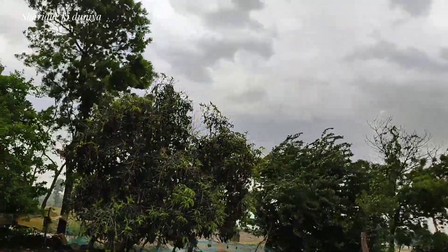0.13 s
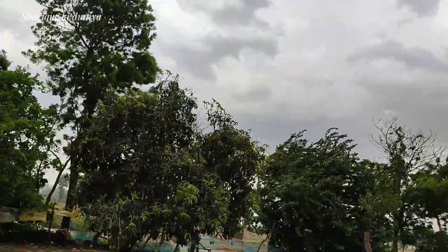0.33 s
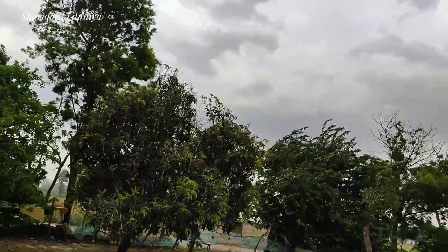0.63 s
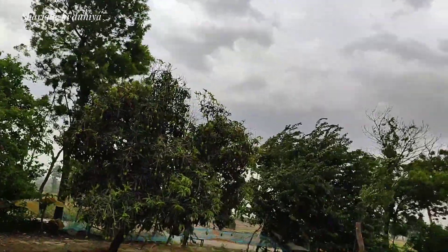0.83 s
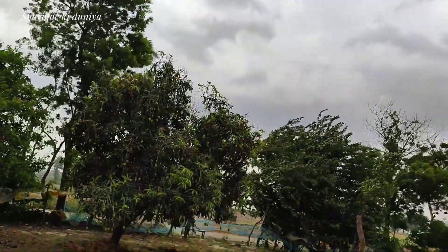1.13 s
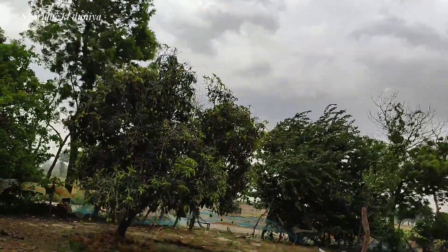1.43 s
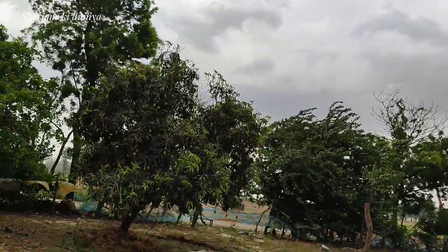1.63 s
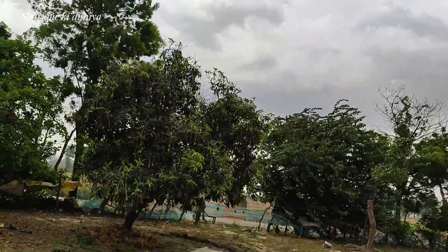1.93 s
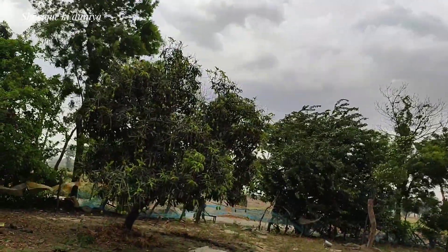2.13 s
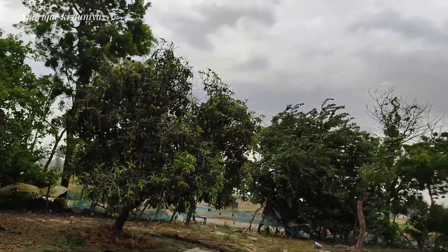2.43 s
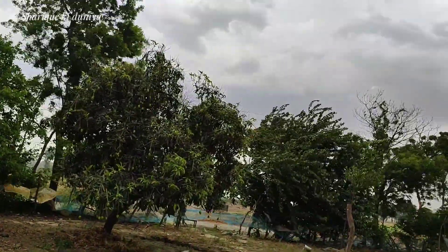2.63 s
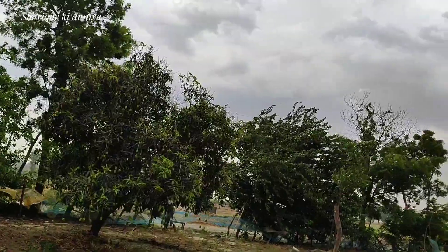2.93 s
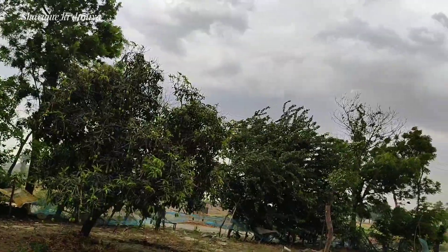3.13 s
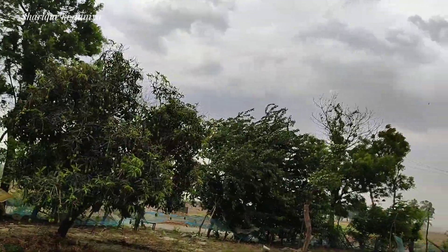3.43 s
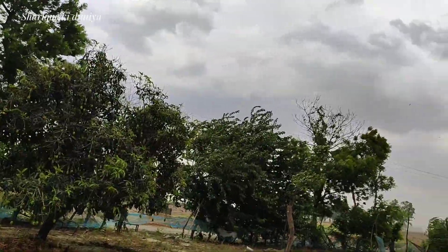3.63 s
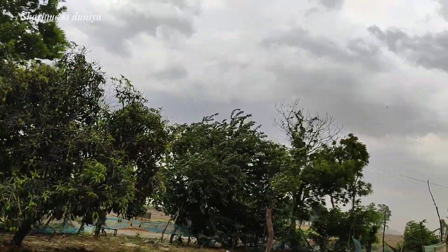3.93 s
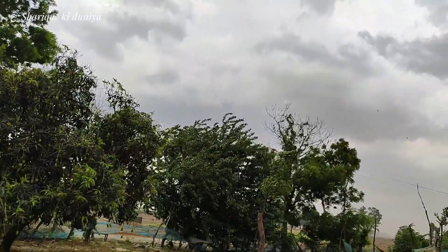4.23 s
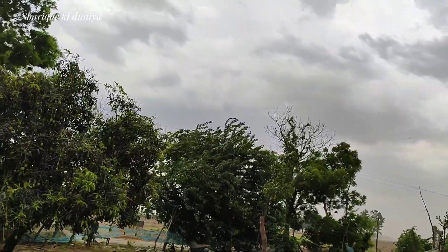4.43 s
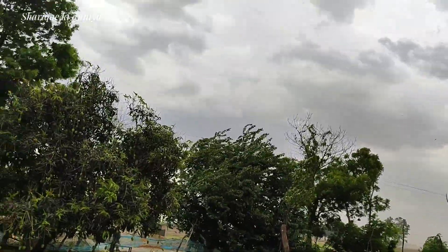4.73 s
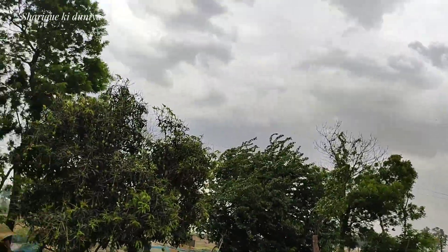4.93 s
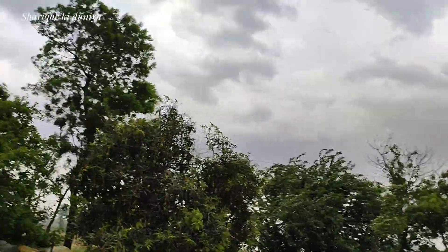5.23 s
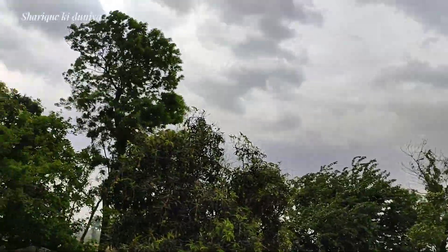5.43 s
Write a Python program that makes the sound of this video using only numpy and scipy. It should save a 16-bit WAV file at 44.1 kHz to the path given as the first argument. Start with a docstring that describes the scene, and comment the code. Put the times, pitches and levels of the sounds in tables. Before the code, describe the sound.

Storm wind buffets the microphone in rumbling gusts, easing and then returning harder, while tree leaves hiss and rustle throughout.

```python
"""The edge of a village, in storm wind, by a row of tossing trees. Distant crowns roar; nearer leaves
hiss, patter and flick close to the microphone. Gusts hit its two ports, mostly the left, as a rumble
that gets brighter and rougher with air speed. They die down, then return harder; the strongest
blasts rasp over the rim of the left port and push the recorder's limiter."""
import sys
import numpy as np
from scipy import signal
from scipy.fft import rfft, irfft, next_fast_len
from scipy.io import wavfile
from scipy.ndimage import uniform_filter1d, minimum_filter1d, map_coordinates

SR = 44100
rng = np.random.default_rng(int(sys.argv[2]) if len(sys.argv) > 2 else 0)


def generate_wav(sig):
    """Save sig (samples, or channels by samples) to the path in sys.argv[1] as 16-bit PCM at SR."""
    pcm = np.round(np.clip(np.atleast_2d(sig).T, -1, 1) * 32767).astype(np.int16)
    wavfile.write(sys.argv[1], SR, pcm)


N = 246078


def from_db(db):
    """Decibels to gain."""
    return 10 ** (np.asarray(db) / 20)


def rms_one(x):
    """Scale to an rms of 1."""
    return x / np.sqrt(np.mean(x ** 2) + 1e-20)


def in_time(rows):
    """Each column of a timed table at every sample."""
    times, *columns = np.transpose(rows)
    return [np.interp(np.arange(N) / SR, times, column) for column in columns]


def at_hz(points, hz):
    """Read a spectrum on a log-frequency axis."""
    freqs, values = np.transpose(points)
    return np.interp(np.log(hz + 1e-9), np.log(freqs), values)


def drift(hz):
    """A random wander with a spread of 1: noise twice through a one-pole low-pass."""
    hop, run_in = 40, 2000
    pole = np.exp(-2 * np.pi * hz * hop / SR)
    noise = rng.standard_normal(N // hop + run_in + 2)
    slow = signal.lfilter([1], [1, -2 * pole, pole * pole], noise)[run_in:]
    return np.interp(np.arange(N) / hop, np.arange(len(slow)), rms_one(slow))


def colour(x, spectrum):
    """Give a sound a spectrum and an rms of 1."""
    size = next_fast_len(N)
    gain = from_db(at_hz(spectrum, np.fft.rfftfreq(size, 1 / SR)))
    return rms_one(irfft(rfft(x, size) * gain, size)[..., :N])


def resonate(x, hz, width_hz):
    """A resonance with a peak gain of 1."""
    r = np.exp(-np.pi * width_hz / SR)
    feedback = [1, -(1 + r * r) * np.cos(2 * np.pi * hz / SR), r * r]
    return signal.lfilter(np.array([1, 0, -1]) * (1 - r * r) / 2, feedback, x)


def mean_along(x, place, reach):
    """Mean of x over the air that lies within reach on either side."""
    samples, total = np.arange(N), np.cumsum(x)
    ahead, behind = (np.interp(place + d, place, samples) for d in (reach, -reach))
    return (np.interp(ahead, samples, total) - np.interp(behind, samples, total)) / (ahead - behind)


def from_all_round(pair):
    """Mix two unrelated sounds into left and right, as alike as a wide source is at each pitch."""
    # likeness of distant sound at the two ports: (frequency [Hz], correlation [-1 to 1])
    likeness = [(30, 1), (350, 0.97), (700, 0.42), (1100, -0.41), (2000, -0.027), (3000, -0.092),
                (5200, -0.084), (6500, 0.33), (7800, 0.37), (9000, 0.96), (15000, 0.82)]
    size = next_fast_len(N)
    alike = np.clip(at_hz(likeness, np.fft.rfftfreq(size, 1 / SR)), -1, 1)
    mid, side = rfft(pair, size) * np.sqrt([1 + alike, 1 - alike])
    return irfft([mid + side, mid - side], size)[:, :N]


def leaves(rustle_db, touches_per_s, size_spread_db, patter_db, toss_db, toss_hz, bands):
    """Each size of leaf rustles in its own band, swelling as twigs toss: far ones hiss, near ones tick."""
    # spectrum of the rustle: (frequency [Hz], relative density [dB])
    spectrum = [(400, -12), (1200, 1.5), (1900, 2), (3300, 2), (5000, 2), (7000, 2.5), (8000, 3.5),
                (8800, -4), (10500, -4.5), (13000, -10.5), (15500, -15.5)]
    rate = touches_per_s * from_db(rustle_db - rustle_db.mean())
    size_db = size_spread_db * np.minimum(rng.exponential(1, (2, N)), 4)
    sizes = from_db(size_db) * rng.choice([-1, 1], (2, N))
    touching = rng.random((2, N)) < rate / SR
    ticks = rms_one(sizes * touching) * from_db(patter_db) * np.sqrt(bands)
    tick_band = rng.integers(bands, size=(2, N))
    hiss = rng.standard_normal((2, 2, N))   # neighbouring bands get unrelated noise
    edges_hz = np.linspace(np.sqrt(500), np.sqrt(16500), bands + 1) ** 2
    rustle = 0
    for k in range(bands):
        bandpass = signal.butter(2, edges_hz[k:k + 2], "band", fs=SR, output="sos")
        band = signal.sosfilt(bandpass, hiss[k % 2] + ticks * (tick_band == k))
        rustle = rustle + band * from_db(toss_db * drift(toss_hz))
    return from_db(rustle_db) * colour(from_all_round(rustle), spectrum)


def far_trees(rustle_db, level_db, follow):
    """The dull roar of distant crowns follows the wind only loosely."""
    # spectrum of the roar: (frequency [Hz], relative density [dB])
    spectrum = [(20, 2.5), (50, 0), (140, -1.5), (260, -6), (400, -6.5), (520, -10), (750, -8),
                (1100, -12.5), (1800, -16.5), (4000, -19), (9000, -42)]
    roar = colour(from_all_round(rng.standard_normal((2, N))), spectrum)
    return from_db(level_db + follow * (rustle_db - rustle_db.mean())) * roar


def through_ports(sound):
    """The cavity behind the microphone's left port rings with the sound that enters it."""
    # resonances of the cavity: (frequency [Hz], width [Hz], boost [dB])
    cavity = [(2454, 920, 6), (7520, 615, 11.5)]
    left, right = sound
    for hz, width_hz, boost_db in cavity:
        left = left + (from_db(boost_db) - 1) * resonate(left, hz, width_hz)
    # above its resonance the cavity dulls the treble
    left = left - 0.46 * resonate(left, hz=9350, width_hz=3700)
    return np.array([left * from_db(-0.65), right])


def wind_force(attack_s, release_s):
    """Buffet level in dB at each port: the slow wind, plus puffs that arrive, hold and let go."""
    # wind on the left port, which faces it: (time [s], level [dB])
    windward = [(0, -8), (.04, -10), (.07, -12.5), (.24, -11), (.29, -16), (.42, -22), (.57, -20),
                (.66, -22.5), (.76, -32.5), (1.5, -34.5), (1.71, -41.5), (3.34, -53), (3.49, -33.5),
                (3.81, -33.5), (3.96, -28), (4.33, -19.5), (4.47, -17.5), (4.56, -18.5), (4.68, -29),
                (4.74, -23.5), (4.83, -23), (4.88, -19), (5.03, -16), (5.14, -12.5), (5.19, -14),
                (5.27, -12), (5.31, -13.5), (5.39, -10.5), (5.58, -7)]
    # wind on the sheltered right port: (time [s], level [dB])
    leeward = [(0, -26.5), (.71, -28), (.78, -39), (1.19, -37.5), (2.8, -57.5), (4.11, -39), (4.81, -38),
               (5.1, -28.5), (5.15, -22.5), (5.33, -18.5), (5.58, -17.5)]
    # single puffs: (start [s], length [s], left rise [dB], right rise [dB])
    puffs = [(0.099, 0.098, 3, 6), (0.477, 0.047, 3, -0.5), (0.607, 0.053, 0.5, 6), (0.927, 0.036, 7.5, 0),
             (1.035, 0.04, 2.5, 8), (1.078, 0.074, 9, 3), (1.244, 0.039, 6.5, 0), (1.389, 0.054, 9, 3),
             (1.885, 0.0501, 14, 0), (3.838, 0.026, 8, 0), (3.974, 0.062, 8, 0), (4.086, 0.09, 3.5, 3),
             (4.281, 0.044, 2, 12.5), (4.35, 0.115, 3.5, -0.5), (4.487, 0.071, 4.5, 8),
             (4.596, 0.0368, 3, 10), (4.862, .036, 3, 11), (4.92, 0.073, 2.5, 11), (5.053, 0.079, 4.5, 0),
             (5.198, 0.09, 4, 1), (5.327, 0.0406, 1, 4), (5.387, 0.069, 2.5, 1), (5.469, 0.019, 0, 4)]
    t = np.arange(N) / SR
    force_db = np.array(in_time(windward) + in_time(leeward))
    for start, length, left_db, right_db in puffs:
        arrive = np.clip((t - start) / attack_s, 0, 1)
        let_go = np.clip(1 - (t - start - length) / release_s, 0, 1)
        force_db = force_db + np.outer([left_db, right_db], arrive * let_go)
    return force_db


def buffet(level_db, rise_db, jump_db, flutter_db, flutter_hz, push, even_eddies, spike, vent_hz):
    """A frozen pattern of eddies is blown past a port: faster air is both higher and louder."""
    # pressure of eddies passing at pattern_hz: (frequency [Hz], relative density [dB])
    eddies = [(15, 3), (50, 5.5), (150, 1), (280, -3), (450, -10), (700, -19.5), (1100, -35.5),
              (1800, -47.5), (3000, -95)]
    pattern_hz, calm_hz, force_hz = 200, 43.74, 831.1
    eddy_hz = calm_hz + force_hz * from_db(level_db) ** 1.02
    surge_db = flutter_db * 2 * np.tanh(drift(flutter_hz) / 2)
    travelled = np.cumsum(from_db(jump_db + surge_db) * eddy_hz / pattern_hz)
    pattern = colour(rng.standard_normal(N), eddies)
    pressure = map_coordinates(pattern, [travelled], order=3, mode="wrap")
    # the slowest pressure changes leak away through the capsule's vent
    pressure = signal.sosfilt(signal.butter(1, vent_hz, "high", fs=SR, output="sos"), pressure)
    # over a few eddies the wind alone sets the power
    reach = even_eddies * SR / pattern_hz / 2
    power = mean_along(mean_along(pressure ** 2, travelled, reach), travelled, reach)
    pressure = pressure / np.sqrt(np.abs(power) + 1e-9)
    # pressure goes with the square of speed, which sharpens the crests
    pressure = pressure + spike * (pressure ** 2 - 1)
    return from_db(level_db + rise_db + push * surge_db) * pressure


def rim_rasp(level_db, grit_db, grit_hz):
    """Air tears off the rim of the port in a dense run of tiny uneven bursts."""
    # spectrum of the rasp: (frequency [Hz], relative density [dB])
    spectrum = [(150, -28), (400, 0.5), (750, 4.5), (1300, -2.5), (2000, -9.5), (2800, -19), (4000, -27),
                (7000, -42), (12000, -70)]
    bursts = rng.standard_normal(N) * from_db(grit_db * np.tanh(drift(grit_hz)))
    return from_db(level_db) * colour(bursts, spectrum)


def leaf_flicks():
    """Leaves brush close to the microphone in short, bright swells of friction noise."""
    # flicks: (time [s], half length [s], left level [dB], right level [dB], centre [Hz], width [Hz])
    flicks = [(0.026, 0.02, -54, -37, 4800, 2500), (0.85, 0.0039, -42, -42, 7020, 5000),
              (2.88, 0.0055, -30.5, -44, 7680, 707), (2.885, 0.03, -36.5, -49, 7200, 1560),
              (5.053, 0.0059, -34, -37, 7900, 8100), (5.258, 0.032, -38.5, -37.5, 7600, 7938)]
    t, out = np.arange(N) / SR, np.zeros((2, N))
    for time, half_s, left_db, right_db, hz, width_hz in flicks:
        noise = rng.standard_normal((2, N))
        friction = rms_one(resonate(resonate(noise, hz, width_hz), hz, width_hz))
        swell = np.exp(-2 * ((t - time) / half_s) ** 2)
        out += from_db([[left_db], [right_db]]) * friction * swell
    return out


def eddy_slaps():
    """The hardest eddies slap the left port: brief jumps of pressure and air speed, both in dB."""
    # slaps: (time [s], half length [s], pressure rise [dB], air speed jump [dB])
    slaps = [(0.042, 0.015, -0.5, 4), (0.081, 0.009, 4.5, -2.5), (0.117, 0.0067, -3, 3),
             (0.154, 0.015, 2.5, 2), (0.189, 0.0045, 4.5, 0.5), (0.218, 0.0055, 4.5, 4),
             (0.234, 0.0083, 0.5, 5), (0.263, 0.0072, 2.5, 2.5), (0.314, 0.01, 4, 4.5),
             (.362, 0.0099, 7, -0.5), (0.5, 0.01, 5, 4.5), (0.536, 0.0072, 11, -1), (0.566, 0.0041, 4, 5.5),
             (0.891, 0.009, 8, 0.5), (0.956, 0.01, 3, 0.5), (1.11, 0.01993, 6.5, 2.5),
             (1.153, 0.014, 4, 2.5), (1.34, 0.0095, 6.5, 0), (1.432, 0.013, 1.5, 0), (1.489, 0.013, 8, -1),
             (3.896, 0.0093, 8, 10), (3.984, 0.0081, 5, 1.5), (4.019, 0.0099, 3.5, 1),
             (4.129, 0.0083, -1, 3), (4.17, 0.011, 6, 1), (4.22, .014, 4.5, 0), (4.285, 0.012, 2, 1),
             (4.362, 0.0058, 5.5, 3.5), (4.405, 0.00591, 5, 1.5), (4.451, 0.0057, 1.5, 2),
             (4.505, .012, 5, .5), (4.549, 0.013, 2, 2), (4.63, 0.011, 3.5, 3), (4.774, 0.0082, 9, 3),
             (4.826, 0.00817, 8, 3.5), (4.878, 0.016, 5.5, -1.5), (4.943, 0.0048, 7, 1),
             (5.065, 0.0041, 3, 1.5), (5.082, 0.0039, 10, -0.5), (5.089, 0.0018, 4, 0),
             (5.113, 0.0051, 6, 2), (5.161, 0.0066, 6.5, 1.5), (5.23, 0.0096, 3.5, 3),
             (5.254, 0.0023, 4, 0.5), (5.282, .007, 1.5, 4), (5.336, .007, 2, -0.5), (5.36, 0.003, 5, 4.5),
             (5.404, 0.0081, 4, 2), (5.454, 0.0048, 1, 2.5), (5.505, .014, 1, 1.5), (5.543, 0.0039, 1.5, 2)]
    t = np.arange(N) / SR
    return sum(np.outer([rise_db, jump_db], np.exp(-((t - time) / half_s) ** 2))
               for time, half_s, rise_db, jump_db in slaps)


def scene():
    """Trees near and far all round the microphone, and the wind itself on each port."""
    # wind in the crowns: (time [s], rustle level [dB], lean to the left [dB])
    crowns = [(0, -39, -2), (.28, -38, -0.5), (.45, -37, 1.2), (.85, -38, 1.8), (1.15, -37.4, 1),
              (1.5, -39, 0.96), (2.3, -40, 1.1), (3.2, -42, 0.95), (4.7, -42.5, 2.5), (5.1, -43, 1.5),
              (5.58, -42, -0.3)]
    # the left port swings until the wind cuts across its rim:
    # (time [s], extra air speed [dB], rasp gain [dB])
    grazing = [(0, -1, -3.5), (.25, -0.7, -10.5), (.7, -0.52, -17), (1.05, 1, -18), (3.9, 0, -18),
               (4.45, .4, -19), (4.9, 0, -9), (5.1, -0.52, -5.5), (5.34, -0.04, -5.5), (5.41, -0.8, -1),
               (5.51, -0.86, 4), (5.58, -1, -2)]
    rustle_db, lean_db = in_time(crowns)
    near = leaves(rustle_db, touches_per_s=700, size_spread_db=2.0, patter_db=-13,
                  toss_db=3.0, toss_hz=23, bands=56)
    far = far_trees(rustle_db, level_db=-39.5, follow=0.47)
    trees = through_ports(near * from_db([lean_db, -lean_db]) + far)
    left_db, right_db = wind_force(attack_s=0.012, release_s=0.018)
    rise_db, jump_db = eddy_slaps()
    sweep_db, rasp_db = in_time(grazing)
    left = buffet(left_db, rise_db, jump_db + sweep_db, flutter_db=1.28, flutter_hz=69.67,
                  push=1.76, even_eddies=8.4, spike=0.086, vent_hz=44.6)
    rasp_power = 2.07   # the rasp grows as this power of the pressure
    rasp = rim_rasp(rasp_power * left_db + jump_db + rasp_db, grit_db=6.5, grit_hz=179)
    right = buffet(right_db, rise_db=0, jump_db=0, flutter_db=1.5, flutter_hz=34.6,
                   push=0.98, even_eddies=2.9, spike=0.023, vent_hz=30.2)
    return trees + leaf_flicks() + np.array([left + rasp, right])


def limiter(x, ceiling_db, release_db_per_s, attack_s):
    """Each channel is turned down just ahead of its peaks and recovers slowly."""
    over_db = np.maximum(20 * np.log10(np.abs(x) + 1e-9) - ceiling_db, 0)
    ramp = release_db_per_s * np.arange(N) / SR
    held_db = np.maximum.accumulate(over_db + ramp, axis=1) - ramp
    span = int(attack_s * SR) + 1
    return x * from_db(uniform_filter1d(minimum_filter1d(-held_db, span), span))


def record(dry):
    """The recorder: a low cut, the limiter, and a steep cut at the top."""
    low_cut_hz, high_cut_hz = 16, 15750
    x = signal.sosfilt(signal.butter(1, low_cut_hz, "high", fs=SR, output="sos"), dry)
    x = limiter(x, ceiling_db=-2.85, release_db_per_s=42, attack_s=0.0058)
    return signal.sosfilt(signal.ellip(12, .1, 90, high_cut_hz, fs=SR, output="sos"), x)


dry = scene()
out = record(dry)
generate_wav(out)
```